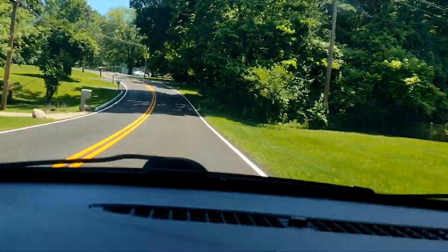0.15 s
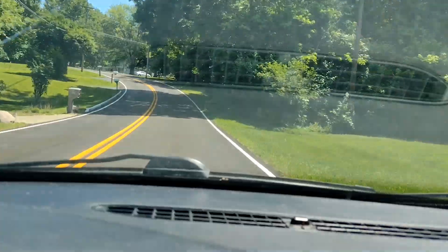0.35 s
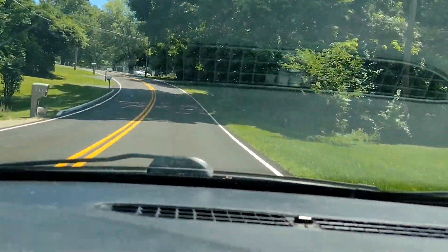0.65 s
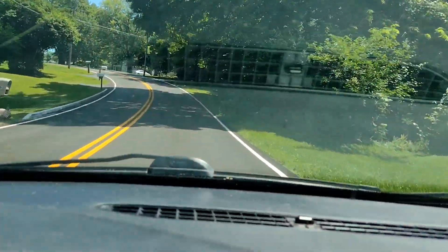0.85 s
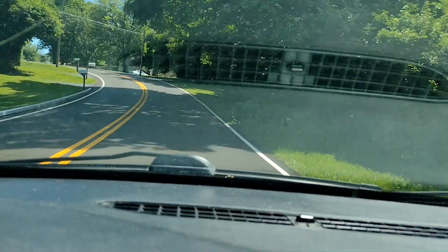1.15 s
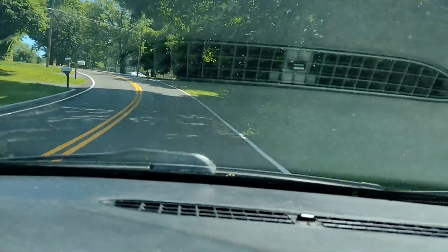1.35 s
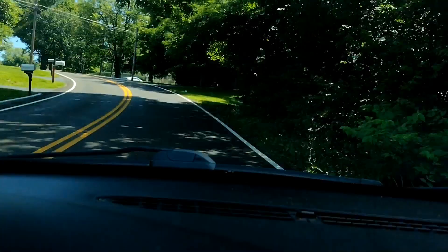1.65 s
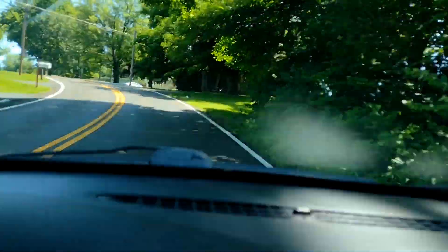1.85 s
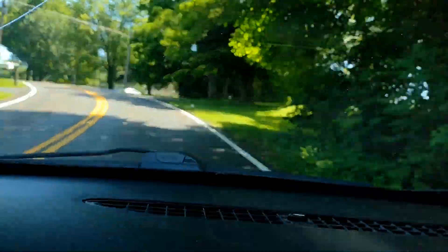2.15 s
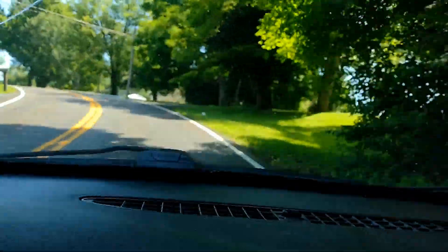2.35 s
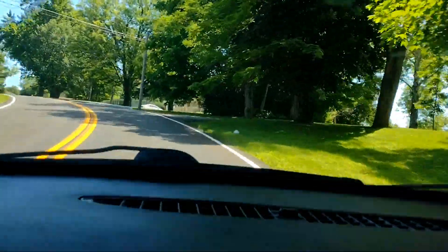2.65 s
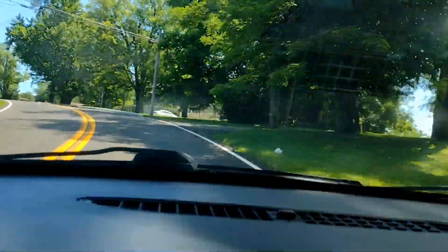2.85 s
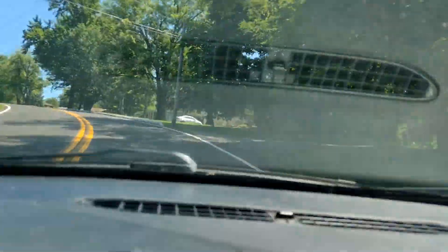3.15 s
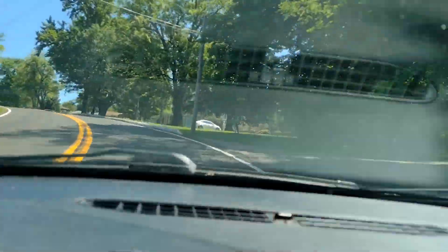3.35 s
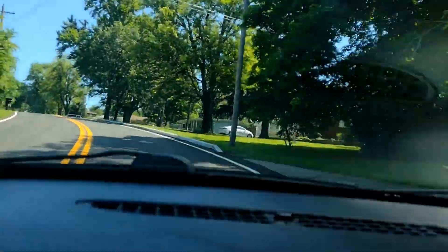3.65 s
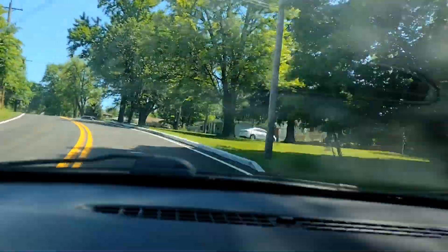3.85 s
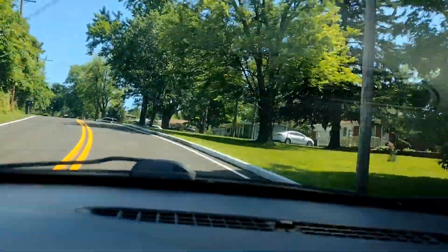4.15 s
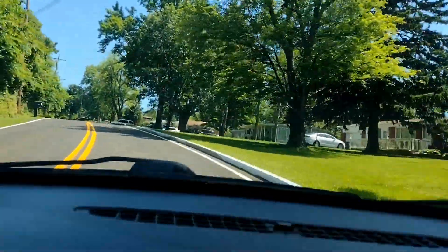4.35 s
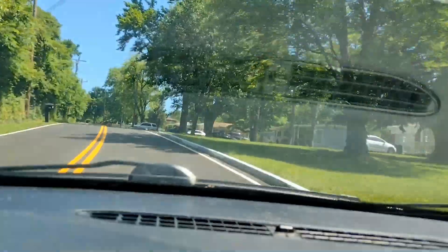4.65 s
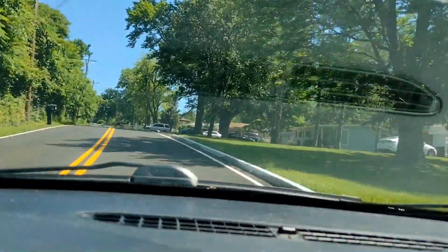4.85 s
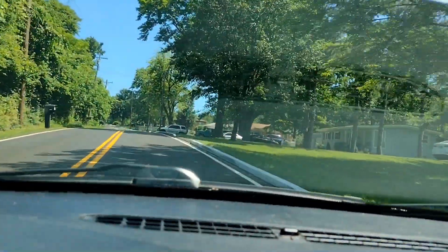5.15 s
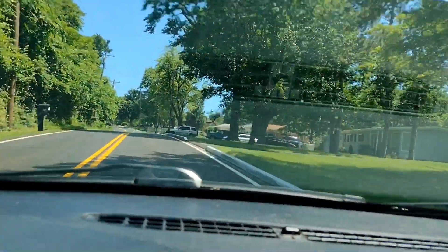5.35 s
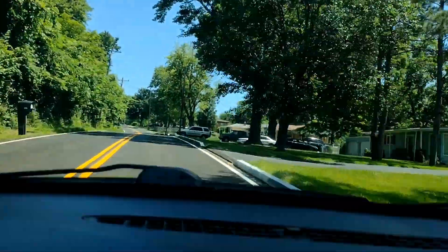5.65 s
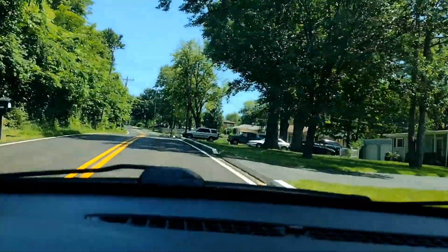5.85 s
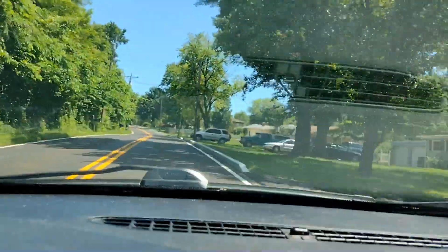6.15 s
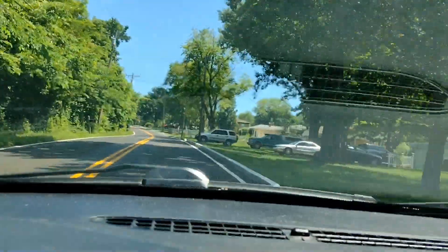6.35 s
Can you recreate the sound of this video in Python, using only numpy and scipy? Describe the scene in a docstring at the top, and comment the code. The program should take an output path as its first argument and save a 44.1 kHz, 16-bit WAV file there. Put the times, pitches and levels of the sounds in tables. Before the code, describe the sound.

Loud low turbo-engine drone heard from the cabin, raspy exhaust and hissing intake rising slowly, then a gear-change lift with burble, boom and air spits.

```python
"""A turbocharged four-cylinder car with an open exhaust, heard from the cabin on the road.
Firing harmonics drone through the cabin over boom, tyre and wind noise; uneven pulses rasp in the pipe.
After a second the driver lifts: drone and intake sag, the pipe burbles, and the revs jump as power returns.
The revs climb under load while intake air hisses and rushes and the ducts sing with boost.
Near the end the driver lifts again to change gear, the revs drop and two sharp spits of air escape."""
import sys
import numpy as np
from scipy import signal
from scipy.fft import rfft, irfft, next_fast_len
from scipy.io import wavfile

SR = 44100
rng = np.random.default_rng(int(sys.argv[2]) if len(sys.argv) > 2 else 0)


def pcm_store(signal):
    """Save signal as 16-bit PCM."""
    levels = np.round(np.clip(np.atleast_2d(signal), -1, 1) * 32767)
    wavfile.write(sys.argv[1], SR, levels.astype(np.int16).T)


N = 287091
TIME = np.arange(N) / SR
SIDES = np.array([[1], [-1]])   # left, right

# engine load, as the level of the rasp in the pipe: start_s, level_db
LOAD = [(0.0, -50.5), (1.3, -52.5), (1.6, -40.5), (2.3, -39), (2.85, -40), (3.45, -29), (4.1, -25.5),
        (5.0, -30.5), (5.55, -29.5), (5.7, -35), (6.15, -37), (6.51, -47)]
# pedal eased, timed half-way through each movement: start_s, end_s, drone_loss_db, burble_db
LIFTS = [(1.055, 1.46, 3.5, -28.5), (1.5, 1.745, 1.5, -29.5), (5.628, 6.177, 7, -29)]
# combustion stumbles as the throttle moves; the drone drops out and the cabin booms:
# centre_s, length_s, share_lost, boom_db
STUMBLES = [(1.287, .01, 1, -25), (1.544, 0.0054, 0.19, -28), (1.663, 0.033, .1, -20.5),
            (5.775, 0.038, 0.82, -17), (6.134, 0.022, 0.51, -20), (6.277, 0.048, .05, -25.5)]
REFERENCE_LOAD_DB = -28


def from_db(db):
    """Decibels to gain."""
    return 10 ** (np.asarray(db) / 20)


def rms_one(x):
    """Scale to unit power."""
    return x / np.sqrt(np.mean(x ** 2) + 1e-20)


def in_time(rows):
    """Each column of a curve, at every sample."""
    s, *columns = np.transpose(rows)
    return [np.interp(TIME, s, c) for c in columns]


def over_hz(points, hz, column=1):
    """A column of a frequency table, interpolated over log frequency."""
    table = np.array(points)
    return np.interp(np.log(np.maximum(hz, 1)), np.log(table[:, 0]), table[:, column])


def drift(corner_hz):
    """Smooth random motion of spread 1: two-pole filtered noise, drawn every 40 samples."""
    step, settle = 40, 2000
    r = np.exp(-2 * np.pi * corner_hz * step / SR)
    raw = rng.standard_normal(N // step + settle + 2)
    slow = signal.lfilter([1], [1, -2 * r, r * r], raw)[settle:]
    return np.interp(np.arange(N) / step, np.arange(len(slow)), rms_one(slow))


def noise(spectrum, resonances=()):
    """Stereo noise of a given colour, lifted at resonances, alike in both ears in the bass."""
    # diffuse sound at the two ears: pitch_hz, likeness, left_right_db
    likeness = [(60, .99, 0), (180, .92, 0), (380, .55, -3), (650, .1, 1), (3000, 0, 0), (7500, -.05, -2.5),
                (10500, -.05, -1), (14000, 0, 3.2)]
    size = next_fast_len(N, real=True)
    hz = np.arange(size // 2 + 1) * SR / size
    mid, side = rfft(rng.standard_normal((2, size)))
    alike = np.clip(over_hz(likeness, hz), -1, 1)
    ears = np.sqrt(1 + alike) * mid + np.sqrt(1 - alike) * side * SIDES
    colour_db = over_hz(spectrum, hz)
    for centre_hz, width_hz, lift_db in resonances:
        colour_db = colour_db + lift_db / (1 + (2 * (hz - centre_hz) / width_hz) ** 2)
    balance_db = SIDES * over_hz(likeness, hz, column=2) / 2
    return rms_one(irfft(ears * from_db(colour_db + balance_db), size)[:, :N])


def resonate(x, hz, width_hz):
    """A two-pole resonance with gain 1 on top."""
    r = np.exp(-np.pi * width_hz / SR)
    zeros = np.array([1, 0, -1]) * (1 - r * r) / 2
    poles = [1, -2 * r * np.cos(2 * np.pi * hz / SR), r * r]
    return signal.lfilter(zeros, poles, x + 1e-18)


def body(x, modes):
    """Parallel resonances of alternating sign, each with its own strength at the two ears."""
    out = 0
    for k, (hz, width_hz, left_db, right_db) in enumerate(modes):
        out = out + (-1) ** k * from_db([[left_db], [right_db]]) * resonate(x, hz, width_hz)
    return rms_one(out)


def band(x, low_hz, high_hz):
    """Steep band-pass."""
    sos = signal.butter(N=5, Wn=[low_hz, high_hz], btype="band", fs=SR, output="sos")
    return signal.sosfilt(sos, x)


def lifted(start_s, end_s):
    """How far the pedal is eased during one lift, 0 to 1."""
    pedal_s = 0.3   # time for a full movement
    return np.clip(np.minimum(TIME - start_s, end_s - TIME) / pedal_s + .5, 0, 1)


def swell(centre_s, length_s):
    """A smooth bump of height 1."""
    return np.exp(-((TIME - centre_s) / length_s) ** 2)


def with_load(load_db, reference_db, db_per_db):
    """Gain of a layer that follows engine load, given its level at the reference load."""
    return from_db(reference_db + db_per_db * (load_db - REFERENCE_LOAD_DB))


def late_left(x, lag_s):
    """The pipe's sound reaches the left ear a little later."""
    return np.array([np.interp(TIME - lag_s, TIME, x[0]), x[1]])


def reflected(x):
    """Hard surfaces close by ripple the spectrum, differently at each ear."""
    # first reflections off glass and dashboard: left_delay_s, right_delay_s, gain
    reflections = [(.0021, .0033, .28), (.0052, .0043, -.26), (.0079, .0094, .24), (.0127, .0113, .2)]
    out = x.copy()
    for left_s, right_s, gain in reflections:
        out += gain * np.array([np.interp(TIME - s, TIME, ear) for s, ear in zip((left_s, right_s), x)])
    return out


def drone(firing_count, firings_per_s):
    """The lowest firing harmonics sweep the cabin's resonances as near-pure tones, throbbing per cycle."""
    # firing harmonics 1 to 4: level_db at reference load, db_per_db of load, flutter_share of height,
    # sag_share in lifts, dropout_share in stumbles
    harmonics = [(0, 0, 0.035, 0.27, 0.17), (0, 0, 0.032, 0.83, 1), (-3, 0, 0.14, 0.35, 0.38),
                 (-1, 0.17, 0.12, 0.26, .1)]
    # cabin answer to a firing harmonic: pitch_hz, gain_db
    cabin_gain = [(60, -21), (83.5, -21.5), (86, -25), (88.8, -37), (91.5, -26), (122, -9), (145, -9.3),
                  (168, -8.2), (185, -10.2), (197, -18.5), (212, -26), (250, -26.5), (275, -26.5),
                  (290, -39), (330, -31.5), (345, -23), (362, -18.5), (370, -19)]
    # standing waves in the cabin: pitch_hz, left_right_db, left_lead_rad
    standing_waves = [(63, 0.5, .05), (85, -1.8, 0.24), (120, 0.6, -0.041), (163, -0.1, 0.2),
                      (193, -0.5, 0.26), (254, 3.5, 0.9), (290, 5, 1.8), (332, -8, 1.6), (342, -5, -0.97),
                      (362, -3, -0.38)]
    lift_flutter = 0.096   # extra with the pedal eased
    cycle_throb, half_cycle_throb = 0.048, 0.015   # shares of the drone's height

    load_db, = in_time(LOAD)
    eased = sum(lifted(start_s, end_s) for start_s, end_s, _, _ in LIFTS)
    sag_db = sum(loss_db * lifted(start_s, end_s) for start_s, end_s, loss_db, _ in LIFTS)
    lost = sum(share * swell(s, length_s) for s, length_s, share, _ in STUMBLES)
    firing = np.clip(1 - lost, .05, 1)
    out = 0
    for multiple, (level_db, db_per_db, flutter, sag, dropout) in enumerate(harmonics, 1):
        hz = multiple * firings_per_s
        height = with_load(load_db, level_db, db_per_db) * firing ** dropout
        height = height * from_db(over_hz(cabin_gain, hz) - sag * sag_db)
        # as its pitch moves, each tone meets other standing waves and leans to one ear
        balance = from_db(SIDES * over_hz(standing_waves, hz) / 2)
        ears = balance * np.exp(.5j * SIDES * over_hz(standing_waves, hz, column=2))
        ears = ears / np.abs(ears.mean(axis=0))
        unsteady = (flutter + lift_flutter * eased) * (drift(18) + 1j * drift(18))
        tone = np.exp(2j * np.pi * multiple * firing_count) * (1 + unsteady)
        polarity = 1 if multiple > 1 else -1   # the fundamental lies below the cabin's boom resonance
        out = out + polarity * np.sqrt(2) * height * np.imag(tone * ears)
    throb = cycle_throb * np.sin(np.pi * firing_count / 2)   # four firings per cycle
    throb += half_cycle_throb * np.sin(np.pi * firing_count)
    return out * (1 + throb)


def firing_pulses(firing_count, scatter_db, jitter):
    """One pulse per firing; the cylinders differ, and no two firings are quite alike."""
    # cylinders in firing order: level_db, lateness_intervals
    cylinders = [(0, 0.0), (-14, .008), (-4, .003), (-11, .01)]
    number = np.arange(int(firing_count[-1]))
    level_db, late = np.array(cylinders)[number % len(cylinders)].T
    chance = rng.standard_normal((len(number), 2))
    at = np.interp(number + late + jitter * chance[:, 0], firing_count, np.arange(N)).astype(int)
    pulses = np.zeros(N)
    pulses[at] = from_db(level_db + scatter_db * chance[:, 1])
    return pulses


def exhaust(firing_count):
    """Pulses ring the pipe; gas puffs out with each; unsteady burning booms and burbles."""
    # resonances of pipe and open end: pitch_hz, width_hz, left_db, right_db
    pipe_modes = [(382, 90, 3.5, -11), (452.3, 33.5, 4, 11.5), (480, 24.8, 7, 9), (532, 41.5, -6, -11.5)]
    tailpipe_modes = [(652, 17, -15.5, 2), (802, 7.3, 7.5, 9), (868.5, 31, 7, 3.5), (987, 22, -10.5, 0),
                      (1037, 44, 4.5, 4.5), (1113, 52, -4, 2.5), (1670, 33, -3, -16.5),
                      (1895, 34, -27.5, -1.5), (2460, 90, -16.5, -33.5)]
    # noise spectra: pitch_hz, density_db
    boom_colour = [(20, -41), (45, -20), (80, -8.5), (105, -11.5), (140, 5), (175, -5), (215, -12),
                   (280, -18.5), (340, -46.5)]
    burble_colour = [(200, -29), (250, -26.5), (310, 2), (385, 6.5), (430, -1), (500, -22), (600, -8.5),
                     (800, -49)]
    rasp_gas, bark_gas = 0.34, 0.52   # turbulent gas against the pulses
    puff_decay_s = .004
    boom_spread = 2.3   # a boom lasts this many times its stumble
    cough_db = -7.5   # burble of a stumble against its boom

    load_db, = in_time(LOAD)
    pulses = firing_pulses(firing_count, scatter_db=1.2, jitter=.004)
    puff_shape = signal.lfilter([1], [1, -np.exp(-1 / (puff_decay_s * SR))], pulses)
    puffs = rms_one(puff_shape * rng.standard_normal((2, N)))

    in_pipe = body(rms_one(pulses) + rasp_gas * puffs, pipe_modes)
    rasp = rms_one(band(in_pipe, low_hz=375, high_hz=850))
    # at the open end the pulses are more even and the gas more turbulent
    at_end = body(rms_one(np.sqrt(pulses)) + bark_gas * puffs, tailpipe_modes)
    bark = rms_one(band(at_end, low_hz=600, high_hz=2900))
    pipe = from_db(load_db) * late_left(rasp, lag_s=0.00034)
    pipe += with_load(load_db, reference_db=-36, db_per_db=0.67) * late_left(bark, lag_s=0.00031)

    stumbling = sum(from_db(boom_db) * swell(s, boom_spread * length_s)
                    for s, length_s, _, boom_db in STUMBLES)
    boom_gain = np.hypot(with_load(load_db, reference_db=-23.5, db_per_db=.27), stumbling)
    boom = boom_gain * noise(boom_colour)

    # the pipe's main ring, heard most with the throttle moving
    ringing = rms_one(band(resonate(pulses, hz=382, width_hz=25), low_hz=230, high_hz=450))
    overrun = sum(from_db(burble_db) * lifted(start_s, end_s) for start_s, end_s, _, burble_db in LIFTS)
    coughs = from_db(cough_db) * stumbling
    steady = with_load(load_db, reference_db=-30.5, db_per_db=0.63)
    burble_gain = np.sqrt(steady ** 2 + overrun ** 2 + coughs ** 2)
    burble = burble_gain * (0.56 * ringing + 0.78 * noise(burble_colour))
    return pipe + boom + burble


def turbo(firing_count, firings_per_s):
    """Intake air hisses, pulsing with the valves, and rushes at full flow; ducts sing at fixed pitches."""
    # airflow: start_s, hiss_db, whistle_db (all layers then pulse)
    airflow = [(0.0, -32, -33.5), (0.7, -30.5, -36), (1.07, -31, -37), (1.22, -48.5, -65),
               (1.295, -54, -56), (1.36, -75, -83), (1.49, -40, -28), (1.7, -33.5, -26.5),
               (1.9, -34.5, -26), (2.5, -29.5, -24), (3.7, -28, -22), (5.6, -29.5, -22), (5.78, -37, -31),
               (5.92, -36, -23.5), (6.04, -41.5, -30), (6.15, -39, -26.5), (6.28, -30.5, -31.5)]
    # noise spectra: pitch_hz, density_db
    hiss_colour = [(1500, -20), (2200, -36.5), (2450, -9), (2650, -23), (3150, 0.5), (3400, -10.5),
                   (3900, -3.5), (4200, -59), (4750, -82), (5800, -5), (6650, -3), (7700, 4), (9500, 1),
                   (11300, -7), (16000, -8)]
    rush_colour = [(800, 2), (1400, -26.5), (2200, -9), (2700, -5.5), (3050, 8.5), (3900, 7.5), (4150, 4),
                   (4350, 2), (5000, 4.5), (5800, 3), (7000, 4), (10000, -13.5)]
    whistle_colour = [(2000, -15.5), (2750, -7), (3100, -12), (3700, -23.5), (4200, -34), (5400, -35),
                      (7000, -16), (8500, -6.5), (9300, 1.5), (11000, -7.5), (12400, 0), (13400, 3),
                      (14200, -4.5), (15000, 8), (16000, -0.5)]
    # intake duct resonances: pitch_hz, width_hz, lift_db
    ducts = [(2450, 130, 5), (3130, 250, 4), (8990, 170, 6), (9530, 250, 4), (12160, 70, 7), (12440, 80, 6),
             (12830, 80, 7), (13120, 100, 3), (15220, 140, 8), (15630, 200, 4)]
    # lower rush: level at the reference hiss and speed, and how it follows them
    rush_reference_db, rush_db_per_hiss_db, rush_db_per_octave = -33, 3.2, 10.5
    reference_hiss_db, reference_firings_per_s = -29.5, 86

    hiss_db, whistle_db = in_time(airflow)
    rush_db = rush_reference_db + rush_db_per_hiss_db * (hiss_db - reference_hiss_db)
    rush_db = rush_db + rush_db_per_octave * np.log2(firings_per_s / reference_firings_per_s)
    hiss = from_db(hiss_db) * noise(hiss_colour)
    rush = from_db(rush_db) * noise(rush_colour)
    whistle = from_db(whistle_db + .5 * drift(33)) * noise(whistle_colour, ducts)
    pulsing_db = 1.0 * np.sin(2 * np.pi * firing_count)   # per firing
    pulsing_db += 0.37 * np.sin(np.pi * firing_count / 2)   # per engine cycle
    pulsing_db += 0.97 * drift(31)
    return (reflected(hiss + rush) + whistle) * from_db(pulsing_db)


def road():
    """Steady tyre and wind noise, strongest in the bass and low mids."""
    # noise spectrum: pitch_hz, density_db
    road_colour = [(20, -1.5), (60, -4), (200, 10.5), (400, 0.5), (600, -15), (1000, -17.5), (1500, -25.5),
                   (2200, -24.5), (2480, -20), (2800, -46.5), (5000, -50), (16000, -61)]
    return from_db(-31) * noise(road_colour)


def spits():
    """Short spits of air: noise through two equal resonances, under a brief bump."""
    # spits: centre_s, pitch_hz, width_hz, length_s, level_db
    spit_table = [(0.288, 7730, 500, 0.018, -26), (0.887, 3470, 1500, 0.0078, -31),
                  (1.294, 9000, 5040, .011, -45), (3.41, 3020, 400, 0.0043, -24),
                  (5.908, 3520, 2000, 0.012, -35), (6.123, 9000, 450, 0.028, -25),
                  (6.127, 15200, 1200, 0.032, -19)]
    out = np.zeros((2, N))
    for centre_s, hz, width_hz, length_s, level_db in spit_table:
        once = resonate(rng.standard_normal((2, N)), hz, width_hz)
        air = rms_one(resonate(once, hz, width_hz))
        out += from_db(level_db) * air / (1 + ((TIME - centre_s) / length_s) ** 2) ** 2
    return out


def scene():
    """Engine speed drives the drone, the exhaust and the intake, over tyre and wind noise."""
    # engine speed: start_s, firings_per_s
    speed = [(0.0, 62.5), (1.07, 61.1), (1.15, 68.4), (1.23, 72.0), (1.38, 70.3), (1.58, 92.0), (1.8, 82.2),
             (2.84, 83.7), (4.55, 89.0), (5.55, 92.0), (5.84, 91.7), (6.04, 88.0), (6.12, 84.0),
             (6.25, 62.5), (6.32, 67.5), (6.38, 65.4), (6.51, 65.6)]
    firings_per_s, = in_time(speed)
    firing_count = np.cumsum(firings_per_s) / SR
    engine = drone(firing_count, firings_per_s) + exhaust(firing_count)
    return engine + turbo(firing_count, firings_per_s) + road() + spits()


def record(dry):
    """Peaks stop at full scale and the top is cut."""
    cutoff_hz = 15750
    sos = signal.ellip(12, .1, 90, cutoff_hz, fs=SR, output="sos")   # ripple and stop-band in dB
    return signal.sosfilt(sos, np.clip(dry, -1, 1))


dry = scene()
out = record(dry)
pcm_store(out)
```